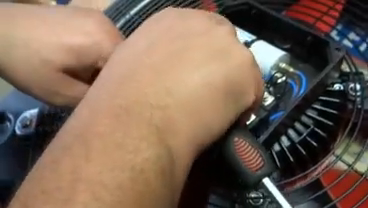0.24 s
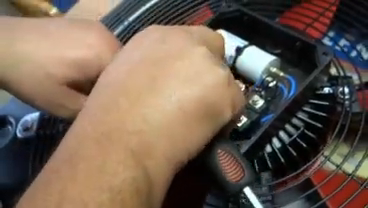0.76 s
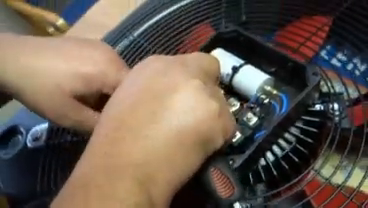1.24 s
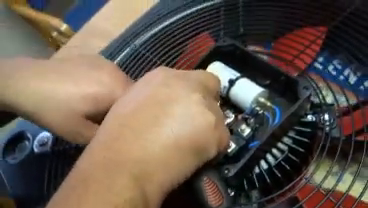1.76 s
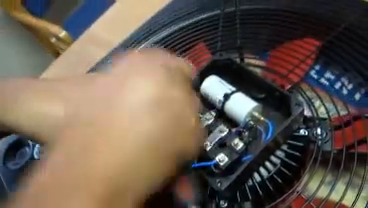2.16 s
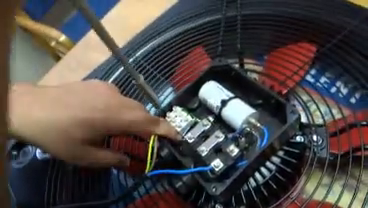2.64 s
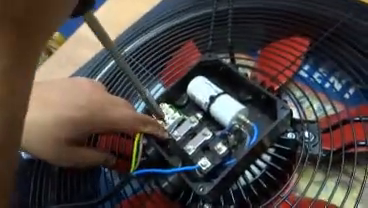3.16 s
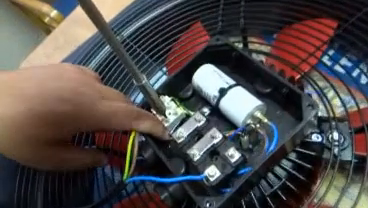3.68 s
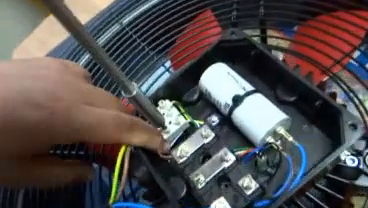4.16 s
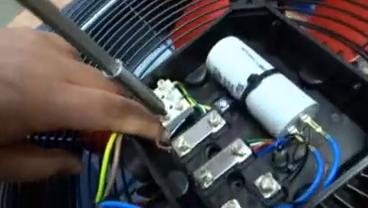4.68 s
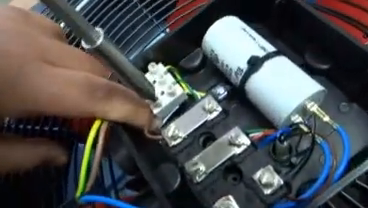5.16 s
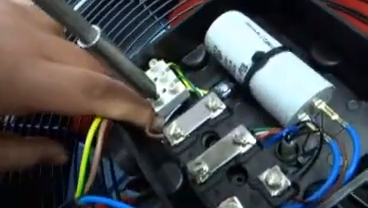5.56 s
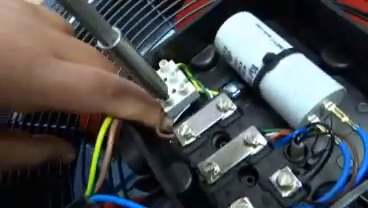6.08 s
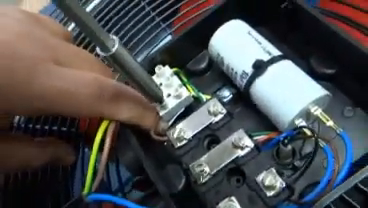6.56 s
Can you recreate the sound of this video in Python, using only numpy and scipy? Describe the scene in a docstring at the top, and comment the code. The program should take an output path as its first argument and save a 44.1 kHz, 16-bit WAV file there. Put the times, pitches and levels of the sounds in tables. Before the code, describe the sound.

A faint low rumble and steady machine hum fill a slightly reverberant workshop throughout. From about 0.7 to 2.1 seconds, close to the microphone, fingers arrange stiff wires in a plastic terminal box, with soft rubbing, short creaks and tiny metallic ticks, ending in a light knock. A lull follows, with small taps near 3.1 and 3.5 seconds, then faint scrapes and thin high squeaks. At 3.9 seconds a screwdriver slips with the loudest sound, a sharp metallic crack and a thud of the box, and a fan's wire guard rings thinly. Two light taps lead to a second strong, doubled knock at 4.4 seconds. From 4.8 seconds until the end near 6.8, the screwdriver turns a screw in seven short, quiet, gritty strokes, about three a second, with bright little clicks, while the low drone grows slightly.

```python
"""A screwdriver works a terminal screw in the plastic terminal box of a large, still fan.
First a hand arranges the wires, which tick on contact and creak by stick-slip friction. The blade slips
twice, and its impacts excite the normal modes of blade, box and wire guard. It then grates in short
turns, each a swell of tiny frictional slips. The room reverberates, and a workshop rumbles and hums
faintly behind."""
import sys
import numpy as np
from scipy import signal
from scipy.fft import rfft, irfft
from scipy.io import wavfile

SR = 44100
rng = np.random.default_rng(int(sys.argv[2]) if len(sys.argv) > 2 else 0)


def master(y):
    """Save y as 16-bit WAV."""
    cut = np.clip(np.atleast_2d(y).T, -1, 1)
    pcm = np.round(cut * 32767)  # scale
    wavfile.write(sys.argv[1], SR, pcm.astype(np.int16))


N = 300762
TIME = np.arange(N) / SR

# Turns of the wrist, about three a second. Each row: start in seconds, regrip level in dB, bite level
# in dB, wait until the thread rasps loudest in seconds, thread level in dB, slot pitch in Hz.
TURNS = [(4.84, -62, -61, 0.11, -51.5, 4720), (5.182, -65, -56.5, 0.077, -48, 4720),
         (5.53, -70, -59.5, 0.065, -55, 4780), (5.819, -70, -56, 0.11, -57.5, 4760),
         (6.153, -61.5, -58, 0.091, -53.5, 4750), (6.464, -66, -54.5, 0.094, -59.5, 4920),
         (6.787, -65.5, -57, 0.074, -52, 4850)]
# Light sliding strokes: metal over wire or terminal, and near 1.9 s a sleeve brushing as the arm swings. Each
# row: start in seconds, length in seconds, # level in dB, brightness from 0 to 1.
SCRAPES = [(1.076, 0.042, -66, 1), (1.75, 0.054, -67, 1), (1.881, 0.18, -62.5, 0.8),
           (1.954, 0.83, -70, 0.45), (3.43, 0.038, -64, 0.4), (3.6, 0.47, -65.5, 0.13),
           (3.773, 0.04, -55.5, 1), (3.98, 0.6, -66, 0.14), (6.033, 0.011, -58, 0.9)]
# Resonances of blade and screw. Each row: ratio to the slot pitch, width in Hz, relative level in dB.
SLOT_MODES = [(0.666, 200, 4), (.81, 260, 4), (1, 240, 5.5)]
# Dull friction of the blade in the slot. Each row: frequency in Hz, relative gain in dB.
SLOT_SPECTRUM = [(600, -9), (1800, 4), (2500, 3), (3200, -13), (3600, 11.5), (4200, 7), (4800, -9.5),
                 (5500, -1), (6500, -1), (8600, 5), (11500, -36)]
# Bright friction of the screw thread. Each row: frequency in Hz, relative gain in dB.
THREAD_SPECTRUM = [(600, -44), (2000, -13.5), (3500, -8.5), (5000, -6.5), (6000, -1.5), (7200, 2.5),
                   (7900, -0.5), (9000, 3.5), (10000, -5), (11000, -8), (11700, -58)]
# The blade skids and lands. Each row: start in seconds, crack level in dB, lower and upper band edges
# in Hz, relative clang level in dB, contact (0 skid, 1 first landing, 2 second landing).
BLADE_SLIPS = [(3.86, -53, 2000, 10000, -12, 0), (3.864, -35, 2130, 9600, 2.5, 0),
               (3.877, -28.5, 3240, 9660, -0.5, 1), (3.8809, -38.5, 654, 9300, -18, 1),
               (3.89, -43, 1680, 9300, -7, 1), (3.892, -43, 1700, 9400, -18, 0),
               (3.8976, -37, 1480, 8000, -22, 0), (4.3646, -41, 500, 5500, -17, 2),
               (4.3739, -33.5, 790, 8650, 1, 2), (4.388, -40.5, 6000, 9350, -18, 2)]
# Modes of the blade. Each row: frequency in Hz, relative levels in dB at contacts 0, 1 and 2.
BLADE_MODES = [(2050, -54, -28.5, -48), (2480, -30.5, -56, -29), (3290, -52, -29, -35),
               (3810, -26.5, -25, -18), (4770, -38, -22, -42), (5080, -23, -33, -27), (5820, -40, -27, -48),
               (6090, -39, -41, -24), (6900, -37, -33, -32), (7500, -42, -38, -24), (7860, -42, -22.5, -42),
               (8600, -27.5, -26, -26), (9250, -31, -35, -29.5)]
# Blows that shake the whole box. Each row: start in seconds, level in dB, struck place (0 or 1).
KNOCKS = [(2.0094, -23, 1), (3.13, -34, 0), (3.878, 0, 0), (4.1350, -24, 0), (4.2366, -18.5, 0),
          (4.3641, -6.5, 1), (4.3738, -4, 1)]
# Modes of the box and its mount. Each row: frequency in Hz, 60 dB decay time in seconds,
# relative levels in dB when struck at places 0 and 1.
BOX_MODES = [(63.9, 1.6, -47, -35), (104.2, 0.96, -39, -36), (113.1, 1.1, -52, -47.5), (119, 0.8, -35, -34),
             (152, 0.062, -21.5, -15), (162.3, 1.1, -43, -31), (184.6, 0.72, -37.5, -46),
             (240, 0.015, -13.5, -24), (243, 0.32, -33, -37.5), (269.4, 0.42, -51, -35.5),
             (313.4, 0.41, -40.5, -43.5), (555, 0.066, -30, -25.5), (560, 0.18, -37, -58),
             (610, 0.3, -39, -57), (658, 0.027, -23, -22), (787, 0.015, -23, -22), (1025, 0.049, -38, -36),
             (1180, 0.018, -33.5, -26.5), (1402, 0.18, -72, -43.5)]
# Modes of the wire guard. Each row: frequency in Hz, 60 dB decay time in seconds, relative level in dB.
GUARD_MODES = [(4830, 0.44, -55), (5000, 0.33, -59), (5200, .45, -54), (6200, 0.36, -56), (7914, 0.38, -60),
               (8900, 0.49, -42)]
# Light contacts of metal, wire and plastic. Each row: start in seconds, level in dB, lower and upper
# band edges in Hz, pitch of the touched part in Hz, gain of its resonance in dB.
CLICKS = [(0.695, -43.5, 5340, 9600, 7700, 2), (1.0358, -51.5, 4200, 11000, 6300, -5),
          (1.353, -55, 2480, 10800, 6300, 5), (1.503, -57, 4400, 8200, 6700, -4),
          (1.555, -58, 2500, 8000, 3980, 8), (1.7878, -53, 6000, 11300, 9500, -7),
          (1.7905, -60, 5500, 10600, 9000, -4), (1.8054, -56.5, 4500, 9500, 6140, 2),
          (1.8962, -56, 7040, 11400, 9500, -2), (1.9915, -52.5, 3480, 9300, 6100, 3),
          (2.144, -56.5, 3000, 10800, 8750, 8), (3.1333, -51.5, 1540, 5870, 5070, 5),
          (3.4505, -49.5, 1890, 7100, 3500, 6), (3.783, -60, 5500, 10500, 8600, 0),
          (3.796, -54, 6500, 11500, 10000, 0), (4.135, -45.5, 6300, 10200, 7960, 4),
          (4.2359, -43, 800, 3900, 3340, -18), (4.513, -43, 6200, 9600, 8400, 2),
          (4.515, -48, 3300, 4540, 3740, 15), (4.527, -50, 2930, 9500, 3700, -4),
          (4.8518, -40.5, 3000, 9900, 4640, 6), (4.8605, -48, 6000, 10000, 7640, 7),
          (4.904, -44, 4430, 9600, 8550, 11), (4.9127, -44.5, 5040, 9800, 8540, 16),
          (4.9454, -51, 3500, 10000, 8500, 5), (5.191, -51.5, 1190, 7000, 3120, 12),
          (5.202, -48.5, 4400, 9700, 8700, 10), (5.5423, -56, 4000, 10500, 7100, 4),
          (5.838, -46, 3000, 10300, 4900, 6), (5.8469, -47, 4000, 10100, 8700, 10),
          (6.157, -49, 3000, 9800, 7250, 5), (6.162, -51.5, 2800, 8500, 3180, 19),
          (6.18, -50.5, 2800, 6000, 4550, 19), (6.3787, -47, 3670, 9400, 6800, 10),
          (6.4734, -49.5, 1180, 8900, 3400, -3), (6.5066, -46.5, 4230, 10100, 8890, -10)]
# A stiff wire slipping in its seat. Each row: start in seconds, initial level in dB, nominal length
# in seconds, initial slips per second.
CREAKS = [(0.835, -44.5, .004, 73), (1.04, -50, .004, 120), (1.056, -37, .004, 170),
          (1.355, -39.5, .004, 100), (1.501, -39, .03, 78), (1.555, -38.5, .02, 105),
          (1.621, -44, .004, 127), (1.634, -39.5, .02, 68), (1.923, -39, .004, 97),
          (1.946, -34.5, .048, 175), (2.008, -32, .004, 70)]
# Box modes excited by a creak. Each row: frequency in Hz, 60 dB decay time in seconds,
# relative level in dB.
CREAK_MODES = [(317, 0.018, -5), (576, 0.04, -1), (717, 0.0087, 11.5), (1065, 0.015, 3),
               (1700, 0.0054, 0.5)]
# Finger strokes over wires and box. Each row: start in seconds, length in seconds, relative level in dB.
RUBS = [(0.983, 0.11, -56), (1.125, 0.75, -61), (1.948, 0.058, -53.5), (3.654, 0.54, -57.5)]
# Friction of skin. Each row: frequency in Hz, relative gain in dB.
RUB_SPECTRUM = [(250, -3), (520, 3), (1150, -9), (1500, -19), (2100, -9), (2700, -16.5), (6000, -19.5),
                (12000, -30)]
# Faint thin squeaks. Each row: start in seconds, length in seconds, first, middle and last pitch in Hz,
# level in dB.
SQUEAKS = [(.43, 0.17, 6870, 6850, 6930, -72), (3.536, 0.13, 9600, 10650, 11600, -73),
           (3.682, 0.14, 6090, 5994, 6160, -57), (3.656, 0.087, 10160, 10010, 10300, -64),
           (3.776, 0.1, 10150, 10380, 10150, -67), (3.816, 0.06, 5700, 5660, 5500, -59),
           (4.04, 0.17, 6440, 6230, 6200, -64.5), (4.167, 0.025, 5450, 5530, 5420, -59.5)]
# Rumble and hiss of the workshop. Each row: frequency in Hz, relative gain in dB.
AIR_SPECTRUM = [(12, -38), (32, -2.5), (75, -6.5), (125, 0), (240, -5), (340, -7.5), (470, -19.5),
                (800, -26), (1400, -35), (2200, -35.5), (6500, -41), (8800, -37.5), (12000, -47.5),
                (15000, -90)]
# Envelope of the machine hum. Each row: time in seconds, relative level in dB.
HUM_LEVELS = [(0, -54.5), (.85, -50.5), (2.3, -53), (3.6, -56), (6.82, -55)]
# Envelope of a low drone that swells late. Each row: time in seconds, level in dB.
DRONE_LEVELS = [(0, -55), (3.8, -58.5), (4.7, -53), (6.82, -54)]
# Broad bands of machine noise. Each row: centre in Hz, width in Hz, level in dB.
MACHINE_BANDS = [(311, 52, -70), (587, 78, -70.5), (1068, 150, -75), (9650, 440, -81)]
# Reverberation of the room. Each row: frequency in Hz, 60 dB decay time in seconds.
ROOM_DECAY = [(100, 1), (500, 0.7), (1500, 0.99), (4000, 0.67), (8000, 0.43), (12000, 0.41)]
# Likeness of left and right in the diffuse field. Each row: frequency in Hz, coherence from 0 to 1.
COHERENCE = [(30, 1), (70, 1), (150, 1), (350, 0.85), (700, 0.39), (1500, 0.12), (4000, 0.64), (10000, 1)]


def screw_grating(chatter_db=0.9, sing_db=4, wander=0.023, drag_db=-76.5):
    """Sliding friction: swells of tiny slips, dull and resonant in the slot, bright in the thread."""
    slips = grains(600, 0.64)
    # The blade seats differently on each turn.
    slot_hz = np.interp(TIME, [row[0] for row in TURNS], [row[-1] for row in TURNS])
    sing = unit(sum(amp(db) * unit(resonate(slips, ratio * slot_hz * (1 + wander * narrow(0, 33)), width))
                    for ratio, width, db in SLOT_MODES))
    grind = colour(grit(900, 1.6, width_hz=470), SLOT_SPECTRUM)
    dull = unit(grind + amp(sing_db) * sing)
    bright = colour(grit(2200, 0.73, width_hz=520), THREAD_SPECTRUM)
    strokes = [(amp(db) * swell(s, length), share) for s, length, db, share in SCRAPES]
    strokes += [stroke for row in TURNS for stroke in wrist_turn(*row[:-1])]
    strokes += [(amp(drag_db) * (TIME > TURNS[0][0]), 0.64)]  # faint drag from the first turn on
    dull_power = sum(level ** 2 * (1 - share) for level, share in strokes)
    bright_power = sum(level ** 2 * share for level, share in strokes)
    chatter = amp(chatter_db * narrow(0, 140))
    return chatter * (np.sqrt(dull_power) * dull + np.sqrt(bright_power) * bright)


def wrist_turn(s, regrip_db, bite_db, wait, thread_db, rise_s=0.039, fall_s=0.014, ease_db=-61):
    """Friction follows motion: one turn is four strokes, each an envelope and a brightness."""
    from_peak = TIME - s - wait
    thread = np.exp(np.minimum(from_peak / rise_s, -from_peak / fall_s))
    return [(amp(regrip_db) * swell(s - 0.11, 0.079), 0.79),  # the blade slides back
            (amp(bite_db) * swell(s, 0.047), 0.19),  # it grinds into the slot
            (amp(thread_db) * thread, 0.88),  # the screw moves
            (amp(ease_db) * swell(s + 0.159, 0.012), 1)]  # a scuff as the wrist lets go


def grit(per_s, spread_db, width_hz, low_hz=2200, high_hz=10800, count=16):
    """Surface roughness: tiny slips at many spots, each exciting a brief resonance of its own."""
    pitches = np.linspace(low_hz, high_hz, count) + width_hz * rng.uniform(-0.48, .5, count)
    return sum(signal.lfilter(*signal.iirpeak(hz, hz / width_hz, fs=SR), grains(per_s / count, spread_db))
               for hz in pitches)


def blade_slips(clang_gain_db=-1, clang_t60=0.014, rise_s=0.00057):
    """Impact on metal: each skid or landing cracks and excites blade modes that the hand damps."""
    cracks, clangs = np.zeros((2, N))
    for s, db, low, high, clang_db, contact in BLADE_SLIPS:
        add(cracks, s, amp(db) * impact(low, high, t60=0.013, ring_db=-17.5, ring_t60=0.2, echo=0.42))
        clang = ring([(hz, clang_t60, dbs[round(contact)]) for hz, *dbs in BLADE_MODES], .1)
        onset = 1 - np.exp(-TIME[:len(clang)] / rise_s)
        add(clangs, s, amp(clang_db + clang_gain_db) * clang * onset)
    return cracks, clangs


def box_knocks(shudder_depth=.4, shudder_hz=28, shudder_rise_s=.08, guard_db=(-12, -13)):
    """Modal vibration: each blow makes the box thud, then shudder, while the guard wires ring thinly."""
    box, guard = np.zeros((2, N))
    unrest = narrow(0, shudder_hz) + 1j * narrow(0, shudder_hz)
    for s, db, place in KNOCKS:
        side = int(place > .5)
        thud = ring([(hz, t60, dbs[side]) for hz, t60, *dbs in BOX_MODES], 1.0)
        depth = shudder_depth * (1 - np.exp(-TIME[:len(thud)] / shudder_rise_s))
        shudder = (1 + depth * unrest[int(s * SR):][:len(thud)]) / np.sqrt(1 + 2 * depth ** 2)
        add(box, s, amp(db) * (signal.hilbert(thud) * shudder).real)
        add(guard, s, amp(db + guard_db[side]) * ring(GUARD_MODES, 1))
    bass_cut = signal.butter(2, 45, "high", fs=SR, output="sos")  # too small to radiate deep bass
    return signal.sosfilt(bass_cut, box), guard


def terminal_clicks(part_width_hz=330):
    """Resonance: wires and blade tip touch the terminals, and each small part rings at its own pitch."""
    out = np.zeros(N)
    for s, db, low, high, hz, part_db in CLICKS:
        tick = impact(low, high, t60=0.0027, ring_db=-29, ring_t60=0.072, echo=0.64)
        rung = signal.lfilter(*signal.iirpeak(hz, hz / part_width_hz, fs=SR), tick)
        add(out, s, amp(db) * unit(tick + amp(part_db) * rung) * tick.std())
    return out


def impact(low_hz, high_hz, t60, ring_db, ring_t60, echo, echo_s=0.00242, rise_s=0.0004):
    """A brief contact is broadband: a dense crack, a weak after-ring and a reflection off the box."""
    t = np.arange(SR // 8) / SR
    envelope = (amp(-60 * t / t60) + amp(ring_db - 60 * t / ring_t60)) * (1 - np.exp(-t / rise_s))
    envelope += echo * np.interp(t - echo_s, t, envelope)
    band = signal.butter(4, (low_hz, high_hz), "band", fs=SR, output="sos")
    burst = signal.sosfilt(band, envelope * rng.standard_normal(len(t)))
    return burst / np.sqrt(np.sum(burst ** 2) / (SR / 200))  # the energy of 5 ms at rms 1


def wire_creaks(soft_hz=2150, jitter=0.057, uneven_db=3.4, grow_db_per_s=40, slowing_per_s=2.29):
    """Stick-slip friction: a bending wire knocks the box in uneven slips that grow and spread apart."""
    out = np.zeros(N)
    slip = sum(ring([mode], .05) for mode in CREAK_MODES)  # modes start in phase: a sharp knock
    slip = signal.sosfilt(signal.butter(4, soft_hz, fs=SR, output="sos"), slip)  # insulation dulls it
    slip /= abs(slip).max()
    for s, db, length, rate in CREAKS:
        for at, (late, size) in zip(np.arange(0, length, 1 / rate), rng.standard_normal(size=(16, 2))):
            when = s + at * (1 + slowing_per_s * at) + jitter * late / rate
            add(out, when, -amp(db + uneven_db * size + grow_db_per_s * at) * slip)
    return out


def finger_rubbing(gain_db=-3, grip_s=3.46, grip_rise_s=0.17, ease_db_per_s=-1.5):
    """Skin friction: fine, even grains in soft strokes, then an easing grip on the terminal block."""
    held = np.maximum(TIME - grip_s, 0)
    grip = np.minimum(held / grip_rise_s, 1) * amp(-60 + ease_db_per_s * held)
    power = grip ** 2 + sum((amp(db) * swell(s, length, shape=0.13)) ** 2 for s, length, db in RUBS)
    return amp(gain_db) * np.sqrt(power) * colour(grains(per_s=1500, spread_db=2.2), RUB_SPECTRUM)


def squeaks(waver=0.002):
    """Frequency modulation: near-pure high tones bend through three pitches and waver a little."""
    out, drift = np.zeros(N), narrow(0, 120)
    for s, length, *pitches, db in SQUEAKS:
        progress = np.linspace(0, 1, int(length * SR))
        glide = np.polyval(np.polyfit([0, .5, 1], pitches, 2), progress)
        hz = glide * (1 + waver * drift[int(s * SR):][:len(progress)])
        arch = abs(np.sin(np.pi * progress)) ** 0.38
        add(out, s, amp(db) * arch * np.sin(2 * np.pi * np.cumsum(hz) / SR))
    return out


def workshop(air_db=-49, hum_hz=296.9, hum_gain_db=1.0, waver=0.18, drone_hz=106.0):
    """Superposition: diffuse rumble and hiss, a steady machine hum, and a low drone that swells late."""
    air = diffuse(*(colour(rng.standard_normal(N), AIR_SPECTRUM) for _ in range(2)))
    hum = np.sin(2 * np.pi * hum_hz * TIME) + waver * narrow(hum_hz, 5)
    hum *= amp(np.interp(TIME, *np.transpose(HUM_LEVELS)) + hum_gain_db)
    drone = narrow(drone_hz, 24) * amp(np.interp(TIME, *np.transpose(DRONE_LEVELS)))
    murmurs = [sum(amp(db) * narrow(hz, width) for hz, width, db in MACHINE_BANDS) for _ in range(2)]
    return amp(air_db) * air + hum + drone + diffuse(*murmurs)


def room(x, early_db=-3, early_t60=0.1):
    """Reverberation: a quick cluster of reflections from bench and fan, then the room's tail."""
    hz, t, spectra = signal.stft(rng.standard_normal((2, SR)), SR, nperseg=256)
    spectra *= amp(-60 * t / read(ROOM_DECAY, hz)[:, None]) + amp(early_db - 60 * t / early_t60)
    tails = signal.istft(spectra, SR, nperseg=256)[1]
    tails[:, :SR // 200] = 0  # the first reflection arrives after 5 ms
    return diffuse(*(signal.fftconvolve(x, tail / np.linalg.norm(tail))[:N] for tail in tails))


def diffuse(mid, other):
    """Partial coherence: two unrelated sounds become the left and right of a diffuse field."""
    same = np.clip(read(COHERENCE, np.fft.rfftfreq(N, 1 / SR)), 0, 1)
    side = irfft(rfft(other) * np.sqrt((1 - same) / (1 + same)), N)
    return np.array([mid + side, mid - side])


def near_left(x, left_db, lead_s=.00001):
    """Localisation: a near source a little to the left arrives there louder and sooner."""
    shift = np.exp(1j * np.pi * np.fft.rfftfreq(N, 1 / SR) * lead_s)
    return irfft(rfft(x) * np.array([amp(left_db) * shift, amp(-left_db) / shift]), N)


def ring(modes, length):
    """Free decay of modes given as (Hz, t60, dB); neighbours swing in opposite phase."""
    t = np.arange(int(length * SR)) / SR
    return sum((-1) ** k * amp(db - 60 * t / t60) * np.sin(2 * np.pi * hz * t)
               for k, (hz, t60, db) in enumerate(modes))


def resonate(x, hz, width):
    """Forced vibration of a resonance that follows the curve hz."""
    spin = np.exp(2j * np.pi * np.cumsum(hz) / SR)
    pole = np.exp(-np.pi * width / SR)
    return 2 * (spin * signal.lfilter([1 - pole], [1, -pole], x / spin + 1e-18)).real


def grains(per_s, spread_db):
    """Shot noise: a random train of tiny impacts of uneven size."""
    size = amp(spread_db * np.minimum(rng.exponential(1, N), 4))
    return size * rng.standard_normal(N) * (rng.random(N) < per_s / SR)


def narrow(hz, width):
    """Narrowband noise at rms 1; centred on 0 Hz it is a random drift."""
    f = np.fft.rfftfreq(N, 1 / SR)
    return unit(irfft(rfft(rng.standard_normal(N)) / (1 + ((f - hz) / (width / 2)) ** 2), N))


def swell(s, length, shape=0.36):
    """The envelope of one hand stroke: an arch from rest to rest."""
    return np.sin(np.pi * np.clip((TIME - s) / length, 0, 1)).clip(0) ** shape


def colour(x, points):
    """Linear filtering by a gain curve, scaled to rms 1."""
    return unit(irfft(rfft(x) * amp(read(points, np.fft.rfftfreq(N, 1 / SR))), N))


def read(points, hz):
    """Interpolation of a table on a log-frequency axis."""
    f, value = np.transpose(points)
    return np.interp(np.log(hz + 1), np.log(f + 1), value)


def add(mix, s, sound):
    """Superposition of a sound on the mix, from s seconds."""
    part = mix[max(round(s * SR), 0):][:len(sound)]
    part += sound[:len(part)]


def amp(db):
    """Decibels to amplitude ratio."""
    return 10 ** (np.asarray(db) / 20)


def unit(x):
    """Normalisation to rms 1."""
    return x / np.sqrt(np.mean(x ** 2) + 1e-20)


def scene():
    """Direct and reverberant fields add over the workshop; the guard's ring is heard only directly."""
    ticks = terminal_clicks()
    handling = wire_creaks() + finger_rubbing()
    scrape = screw_grating() + squeaks()
    box, guard = box_knocks()
    crack, clang = blade_slips()
    echoes = room(amp(-8.5) * ticks + amp(-11) * crack + amp(-22) * clang
                  + amp(-8) * box + amp(-5.5) * handling + amp(-4.5) * scrape)
    metal = near_left(ticks + crack + clang + guard + scrape, left_db=.55)
    plastic = near_left(box + handling, left_db=0.33)
    return metal + plastic + echoes + workshop()


def record(dry, edge_hz=11950):
    """Band limiting: a steep low-pass filter removes the highest treble."""
    low_pass = signal.firwin(301, edge_hz, window=("kaiser", 8), fs=SR)
    return signal.oaconvolve(dry, low_pass[None], "same")


dry = scene()
out = record(dry)
master(out)
```